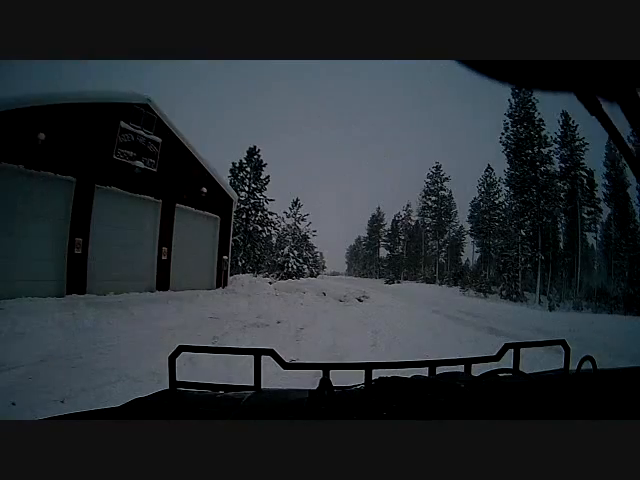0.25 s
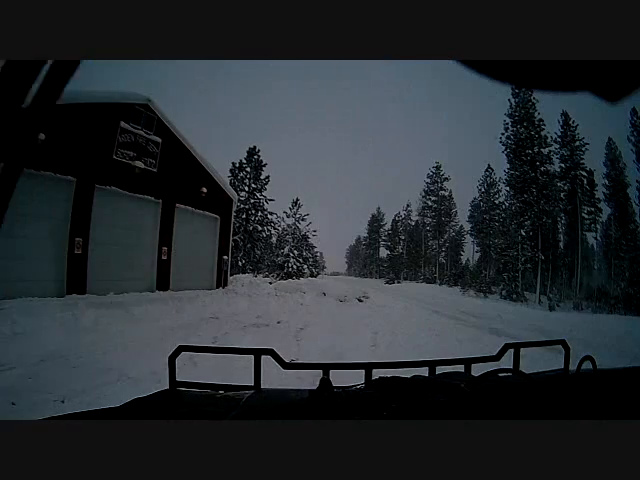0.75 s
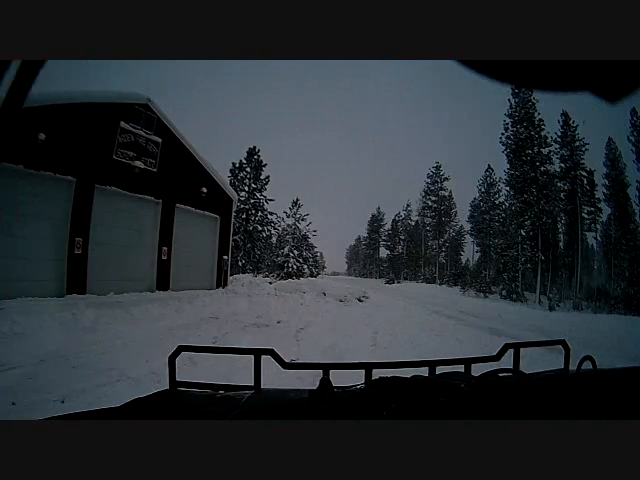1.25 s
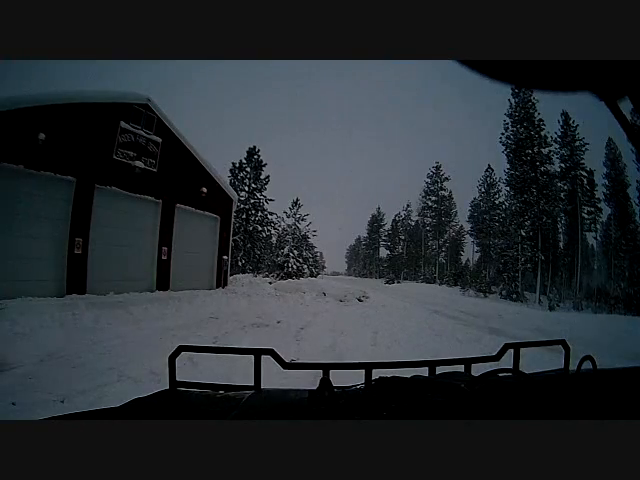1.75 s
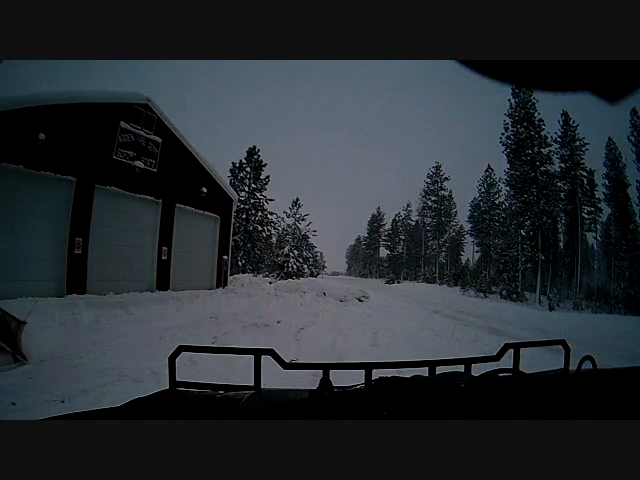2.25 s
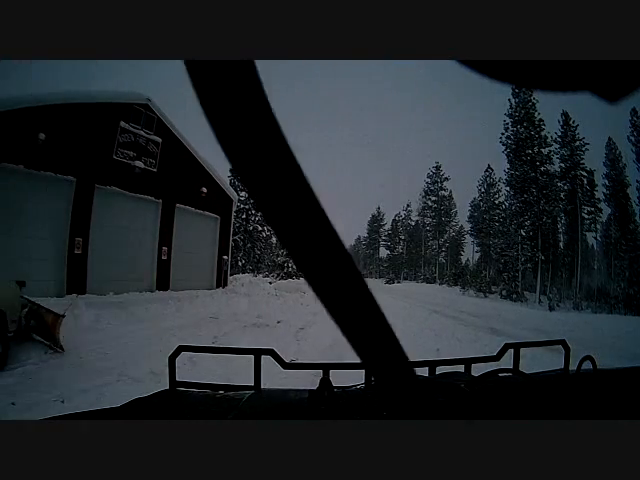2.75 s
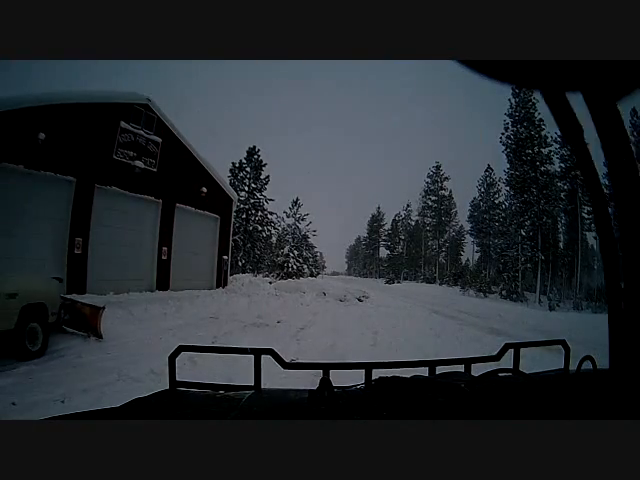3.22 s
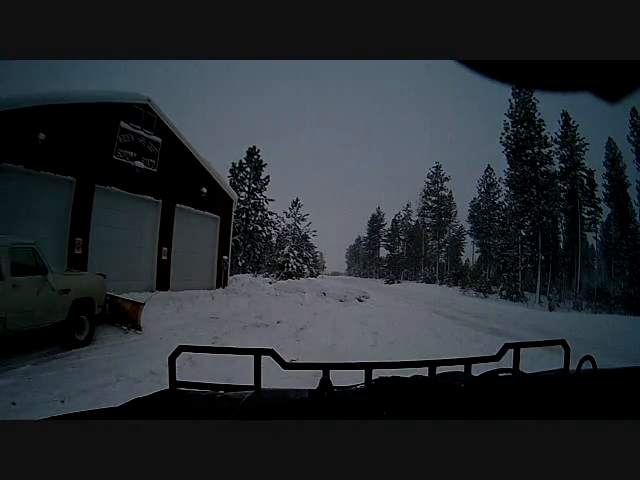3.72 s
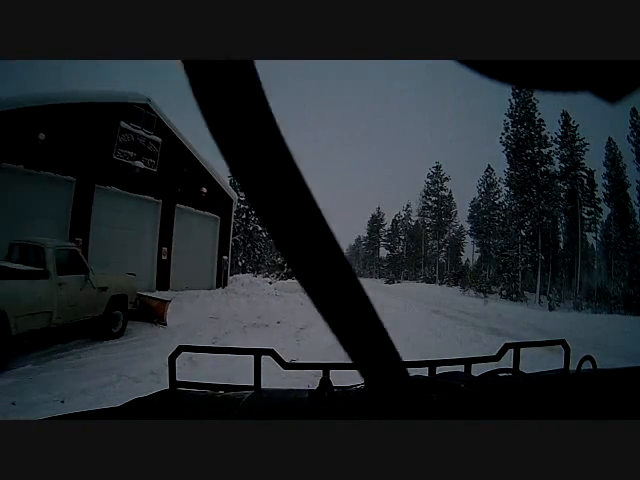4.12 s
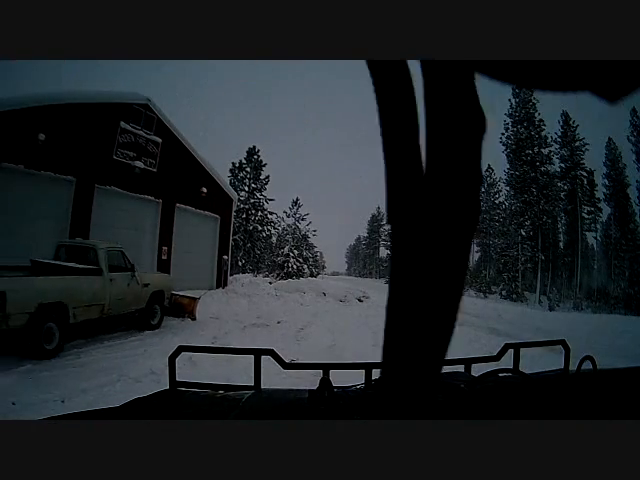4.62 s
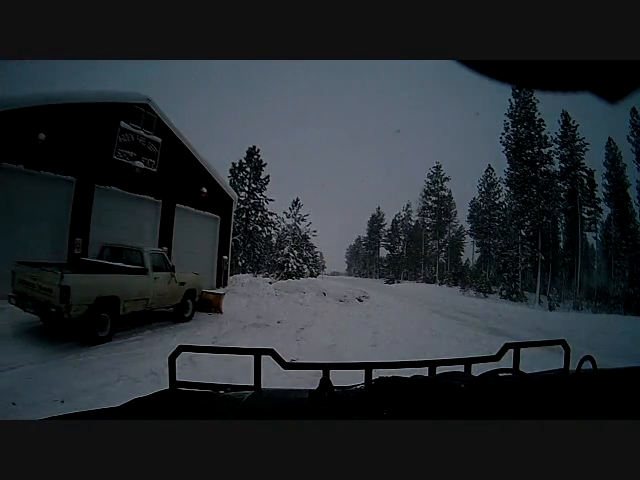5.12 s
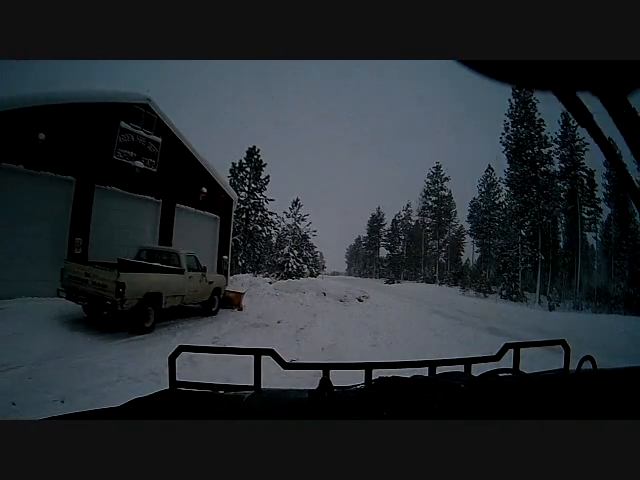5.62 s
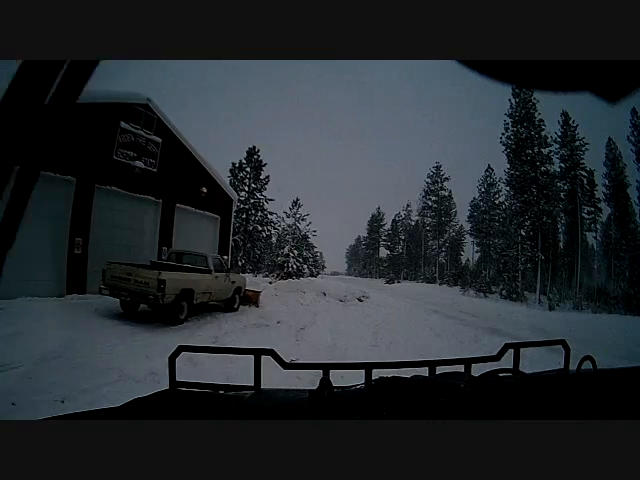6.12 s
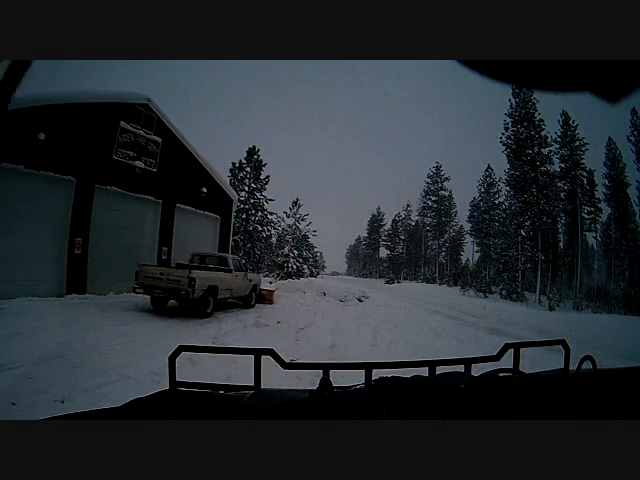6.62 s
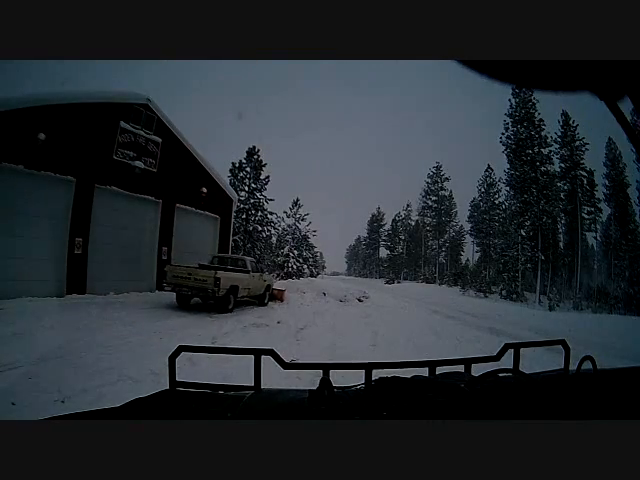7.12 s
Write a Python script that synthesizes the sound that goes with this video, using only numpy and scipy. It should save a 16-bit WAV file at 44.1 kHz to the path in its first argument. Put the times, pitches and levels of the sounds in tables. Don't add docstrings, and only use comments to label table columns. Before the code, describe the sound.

Close inside a small parked cab, a heater fan roars steadily over a low wavering engine idle. About every 1.35 seconds, icy wiper blades catch and slip in a rapid burst of blunt windscreen thumps, each with a thin metallic rattle and brief gritty scrape. A pickup's exhaust note rises outside and fades. A small microphone on the glass distorts the loudest thumps.

```python
import sys
import numpy as np
from scipy import signal
from scipy.fft import rfft, irfft
from scipy.io import wavfile
from scipy.ndimage import uniform_filter1d

SR = 44100
rng = np.random.default_rng(int(sys.argv[2]) if len(sys.argv) > 2 else 0)


def undo_db(level):
    steps = np.asarray(level, float) / 20
    return 10 ** steps


def dump_mix(stems):
    frames = np.atleast_2d(stems).T
    limited = np.clip(frames, -1, 1)
    pcm = np.round(limited * 32767).astype(np.int16)
    wavfile.write(sys.argv[1], SR, pcm)


N = 324576
TIME = np.arange(N) / SR
BINS = np.fft.rfftfreq(N, 1 / SR)

# (frequency [Hz], level per Hz [dB])
BLOWER_SPECTRUM = [(4, -18), (28, -4.5), (70, -3.5), (97, -3), (138, -1), (234, -11), (276, -0.5),
                   (579, -8.5), (789, -11.5), (1030, -6.5), (1580, -19.5), (1780, -24.5), (2800, -25.5),
                   (6000, -63)]
# (frequency [Hz], width [Hz], gain [dB])
DUCT_RESONANCES = [(140.7, 17, 5), (218, 41, 4), (256, 19, 1.5), (414.6, 83, 4.5), (499, 91, 3),
                   (585, 60, 7), (706, 52, 6.5), (829, 50, 6.5), (1010, 210, 2), (1323, 153, 4.5),
                   (1597, 213, 8.5), (1734, 49, -7.5), (1890, 34, 5), (2110, 54, 5), (2462, 82, 5),
                   (2840, 56, 3), (3280, 200, 4), (3555, 170, 5.5), (4000, 80, 2.5), (4670, 75, 7),
                   (820, 28, -3.5), (864, 19, -8.5), (1146, 54, -4.5), (1422, 50, -9), (1890, 43, -1),
                   (2140, 50, -1), (2600, 60, 0.5), (3160, 85, 0.5), (3470, 60, -3.5), (3840, 160, -4)]
BLOWER_DB, SWELL_DB, FLICKER_DB = -26, .6, 1.9

# (frequency [Hz], level [dB], wobble [dB])
IDLE_NOTES = [(59.5, -45.5, 6.5), (80.7, -47, -5), (112.5, -45, 0)]
# (frequency [Hz], level [dB])
IDLE_SHAKE = [(15.5, -39), (37.3, -40.5)]
# (time [s], firing rate [Hz], level [dB], octave level [dB])
PICKUP_EXHAUST = [
    (0, 42.7, -54, -34),
    (.5, 46.5, -53, -53),
    (1, 53.6, -36, -55),
    (1.5, 60, -37, -54),
    (2.001, 69.4, -30.5, -27.5),
    (2.4, 74, -33.5, -45),
    (3.2, 75.8, -33, -39),
    (3.999, 77.06, -37, -36),
    (5.498, 78.4, -66, -43),
    (7.36, 76.9, -48, -50),
]

# (frequency [Hz], level per Hz [dB])
SCRAPE_SPECTRUM = [(1500, 1.5), (3000, 3.5), (5000, -11), (7000, -15.5), (8500, -23.5), (16000, -28)]
SCRAPE_DB, SCRAPE_S, GRAIN_DB = -35, .0045, 3.5

# (time [s], force [dB], snap delay [ms], snap level [dB], high ring level [dB])
BLADE_FLIPS = [
    [(.7646, -5.5, 5.9, -18.5, -35), (2.1113, -9, 5.7, -17.5, -24), (3.4547, -5, 6.1, -17, -32),
     (4.7884, -5.5, 5.4, -29, -48), (6.1446, -1, 4.4, -22, -48)],
    [(2.1817, -3, 3.9, -17, -48), (3.5299, 0, 5.2, -17.5, -40), (6.1237, -4.5, 4.8, -20, -46)],
]
# (time [s], force [dB], snap delay [ms], snap level [dB])
JUDDER_SLIPS = [(0.746, -7.5, 6.3, -32), (0.7747, -9, 6.1, -37), (0.7868, -11, 5.2, -50),
                (0.804, -7.5, 5.2, -33), (0.8203, -6.5, 6.1, -28), (0.8361, -8.5, 3.8, -40),
                (0.8469, -11.5, 0.46, -32), (2.0743, -11.5, 1.2, -46), (2.0927, -5.5, 9, -39),
                (2.1212, -1.5, 7.2, -25), (2.158, -9, 8.6, -43), (2.1663, -6, 1.6, -42),
                (2.189, -4.5, 5.6, -33), (2.1942, -2, 4.4, -22.5), (2.2022, -16, 1.9, -42),
                (3.4197, -12, .1, -45), (3.4361, -5.5, 5.3, -23), (3.4655, -6, 5.1, -26),
                (3.4796, -4.5, 4.2, -34), (3.5084, -5.5, 3.7, -33), (3.544, -5, 11, -28),
                (3.5666, -8, 3.4, -46), (3.584, -8, 1.2, -31), (4.7563, -10.5, 4.2, -43),
                (4.7728, -5, 3.8, -31), (4.7992, -10.5, 4.8, -44), (4.8082, -7.5, 5.4, -45),
                (6.1032, -7, 4.5, -28), (6.1618, -5, 4.8, -23.5), (6.1733, -7, .1, -30)]

# (frequency [Hz], level [dB], time to fade 60 dB [s])
FRAME_RINGS = [
    [(1400, 0.5, 0.0097), (1900, -14, 0.0035), (2350, -5, 0.0061), (2620, 0, 0.0069), (2950, -3, 0.0035),
     (3550, -1, 0.0066), (4440, -13, 0.0054)],
    [(5540, -2, 0.0045), (6430, 2, 0.007), (6600, 0, 0.006)],
    [(8100, 2, 0.0043), (8720, 3, 0.017), (10300, -22, 0.003), (12500, -7, .003), (14500, -18, .002)],
]
# (time [s], low ring [dB], middle ring [dB], high ring [dB])
SETTLING_TICKS = [(.054, -60, -60, -58), (.8004, -43, -48, -60), (.8357, -35, -47, -60),
                  (1.298, -39, -47, -52), (2.1059, -34, -45, -60), (2.141, -26, -45, -62),
                  (3.519, -42, -44, -50), (3.559, -26, -40, -57), (3.5763, -41, -45, -60),
                  (3.609, -46, -54, -66), (3.617, -46, -54, -66), (4.7842, -32, -45, -61),
                  (4.8018, -34, -38, -53), (6.192, -41, -52, -60)]
# (time after the snap [ms], low ring under the snap [dB],
# middle ring under the snap [dB], high ring under its own snap [dB])
BLADE_REBOUNDS = [(5.7, -7, -7, -14), (4.0, -5, -14, -6)]
TICK_DB, TICK_COLOUR_DB = -34, (-19, -23)
SNAP_COLOUR_DB, COLOUR_SCATTER_DB = (-15, -31), 3.5
CHATTER_MS, CHATTER_DB, CHATTER_SCATTER = 4.8, -9, .25
DULL_HZ = 9000
CAB_DB, CAB_FADE_S = -13, .03

# (frequency [Hz], level [dB], time to fade 60 dB [s])
GLASS_RINGS = [(58, -9.5, 0.052), (109, 6, 0.098), (170.5, -5, 0.12), (229, -4.5, 0.069), (307, -32, 0.069),
               (418, -66, 0.017), (641, -10, 0.078), (842, -12.5, 0.11), (1480, -6.5, 0.098)]
PUSH_MS, PUSH_SCATTER, SWALLOWED, SWALLOW_SCATTER = 1.62, .12, .43, .13
SKIP_MS, SKIP_DB, SKIP_SCATTER_DB = 2.75, -10.5, 2.5
FLIP_PUSH_MS, FLIP_SWALLOWED, FLIP_SKIP_DB = 1.95, .31, -11.5

# (frequency [Hz], level per Hz [dB])
CAMERA_HISS = [(2940, -29), (5000, 1), (7960, -3), (15100, -3), (15700, -4.5)]
# (frequency [Hz], level [dB])
CAMERA_WHINE = (15176, -84)
CLEAR_SEAMS = {6: -47, 16: -44, 21: -48, 27: -43, 56: -44, 66: -45, 81: -45, 104: -44, 130: -47, 133: -44,
               134: -45, 143: -45}
HISS_DB, TOP_HZ = -66, 15800
OVERLOAD_LEVEL, KNEE = .51, 8
FIRST_SEAM_S, BLOCK_S = .07195, 2036 / SR
SEAM_DB, SEAM_SCATTER_DB, FIRST_JUMP_DB = -51.5, 1.5, -14.5


def unit(x):
    return x / np.sqrt(np.mean(x ** 2))


def slope_db(points):
    hz, db = np.transpose(points)
    return np.interp(np.log(BINS + 1), np.log(hz), db)


def shaped_noise(db):
    return irfft(rfft(rng.standard_normal(N)) * undo_db(db), N)


def walk(rate):
    k = int(SR / rate)
    levels = np.repeat(rng.standard_normal(N // k + 1), k)
    return 1.32 * uniform_filter1d(uniform_filter1d(levels, k), k)[:N]


def add(out, s, piece):
    i = int(s * SR)
    out[i:i + len(piece)] += piece[:N - i]


def blower():
    db = slope_db(BLOWER_SPECTRUM) - 30 * (BINS > 6000)
    for hz, width, gain_db in DUCT_RESONANCES:
        db = db + gain_db / (1 + (2 * (BINS - hz) / width) ** 2)
    air = rfft(rng.standard_normal(N)) * undo_db(db)
    out, swell = 0, walk(2.5)
    place = 2 * np.log2((BINS + 1) / 20)
    for k in range(19):
        band = irfft(air * np.clip(1 - abs(place - k), 0, 1), N)
        wander_db = SWELL_DB * swell + FLICKER_DB * walk(14)
        out = out + band * undo_db(wander_db * (1 - k / 20))
    gusts = undo_db(.55 * walk(70))
    return unit(out * gusts) * undo_db(BLOWER_DB)


def pickup():
    s, *columns = np.transpose(PICKUP_EXHAUST)
    hz, db, octave_db = (np.interp(TIME, s, c) for c in columns)
    turn = 2 * np.pi * (np.cumsum(hz) / SR + .14 * walk(5))
    octave = undo_db(octave_db - .5 + .48 * walk(21)) * np.sin(2 * turn)
    return undo_db(db) * np.sin(turn) + octave


def idling_engine():
    out = np.zeros(N)
    for hz, db, wobble in IDLE_NOTES:
        level = undo_db(db + 1 + wobble * walk(6.8))
        out += level * np.sin(2 * np.pi * (hz * TIME + .043 * walk(1.83)))
    for hz, db in IDLE_SHAKE:
        out += undo_db(db + 3 + walk(2)) * np.sin(2 * np.pi * hz * TIME + .5 * walk(.8))
    return out


def scrape():
    grip, t = np.zeros(N), TIME[:3000]
    for s, force_db, *_ in JUDDER_SLIPS + BLADE_FLIPS[0] + BLADE_FLIPS[1]:
        add(grip, s, undo_db(force_db) * t / SCRAPE_S * np.exp(1 - t / SCRAPE_S))
    low_cut = np.where(BINS > 1200, 0, -400)
    grit = unit(shaped_noise(slope_db(SCRAPE_SPECTRUM) + low_cut))
    return undo_db(SCRAPE_DB + GRAIN_DB * walk(500)) * grip * grit


def coloured(s, db, under, chance):
    return (s, db, *(db + np.array(under) + COLOUR_SCATTER_DB * chance[:2]))


def snaps():
    rows = [(row, back) for blade, back in zip(BLADE_FLIPS, BLADE_REBOUNDS) for row in blade]
    rows += [(row, None) for row in JUDDER_SLIPS]
    out = list(SETTLING_TICKS)
    for (row, back), c in zip(rows, rng.standard_normal((len(rows), 4, 4))):
        s, force_db, delay_ms, db, *high = row
        out.append(coloured(s, force_db + TICK_DB + 2.1 * c[0, 2], TICK_COLOUR_DB, c[0]))
        s += delay_ms / 1000
        if high:
            out.append((s, db, db + SNAP_COLOUR_DB[0], high[0]))
            back_ms, low_db, middle_db, high_db = back
            s += back_ms / 1000
            out.append((s, db + low_db, db + middle_db, high[0] + high_db))
            db += low_db
        else:
            out.append(coloured(s, db, SNAP_COLOUR_DB, c[1]))
        for r in c[2:]:
            s += CHATTER_MS * np.exp(CHATTER_SCATTER * r[2]) / 1000
            db += CHATTER_DB
            out.append(coloured(s, db + 1.4 * r[3], SNAP_COLOUR_DB, r))
    return out


def rattles():
    out, t, knocks = np.zeros(N), TIME[:1000], snaps()
    chance = rng.standard_normal((len(knocks), 16, 150))
    for (s, *levels), c in zip(knocks, chance):
        scratch = c[0] * t[:150] * np.exp(-t[:150] / .0005)
        k = 0
        for db, modes in zip(levels, FRAME_RINGS):
            body = 0
            for hz, gain_db, t60 in modes:
                k += 1
                tone = np.sin(2 * np.pi * hz * (1 + c[k, 0] / 60) * t)
                body = body + undo_db(gain_db + c[k, 2]) * tone * np.exp(-np.log(1000) * t / t60)
            ring = np.convolve(scratch, body)
            add(out, s - .001, undo_db(db + 6) * ring / abs(ring).max())
    out = signal.lfilter(*signal.butter(1, DULL_HZ, fs=SR), out)
    echo = rng.standard_normal(4000) * np.exp(-np.log(1000) * TIME[:4000] / CAB_FADE_S)
    return out + undo_db(CAB_DB) * signal.fftconvolve(out, echo / np.linalg.norm(echo))[:N]


def slips():
    rows = [(row, PUSH_MS, SWALLOWED, SKIP_DB) for row in JUDDER_SLIPS]
    rows += [(row, FLIP_PUSH_MS, FLIP_SWALLOWED, FLIP_SKIP_DB) for row in BLADE_FLIPS[0] + BLADE_FLIPS[1]]
    out = []
    for (row, push_ms, swallowed, skip_db), c in zip(rows, rng.standard_normal((len(rows), 6))):
        s, db = row[:2]
        out.append((s, db, push_ms * np.exp(PUSH_SCATTER * c[0]), swallowed + SWALLOW_SCATTER * c[1]))
        landing_s = s + SKIP_MS * np.exp(.14 * c[2]) / 1000
        landing_db = db + skip_db + SKIP_SCATTER_DB * c[3]
        landing_ms = PUSH_MS * np.exp(PUSH_SCATTER * c[4])
        out.append((landing_s, landing_db, landing_ms, .098 + SWALLOW_SCATTER * c[5]))
    return out


def panel(force, hz, t60):
    w = 2 * np.pi * hz
    return signal.lfilter(*signal.bilinear([1, 0, 0], [1, 2 * np.log(1000) / t60, w * w], SR), force)


def thumps():
    out, t, pushes = np.zeros(N), TIME[:6000] * 1000, slips()
    chance = rng.standard_normal((len(pushes), len(GLASS_RINGS), 2))
    noise = rng.standard_normal((len(pushes), 6000))
    trim_noise = signal.lfilter(*signal.butter(3, [300, 1600], "band", fs=SR), noise)
    for (s, db, push_ms, swallowed), c, trim in zip(pushes, chance, trim_noise):
        force = np.sin(np.pi * np.clip(t / push_ms, 0, 1)) ** 2
        ring, total_gain = 0, 0
        for (hz, gain_db, t60), (a, b) in zip(GLASS_RINGS, c):
            gain = undo_db(gain_db + 2 * a)
            ring = ring + gain * panel(force, hz * (1 + .032 * b), t60)
            total_gain += gain
        ring = ring - np.clip(swallowed, 0, 1) * total_gain * force
        shudder = trim * (t / 4) * np.exp(-t / 6)
        add(out, s - push_ms / 2000, undo_db(db - 7.5) * (ring + shudder))
    return out


def scene():
    background = blower() + pickup() + idling_engine()
    wipers = scrape() + rattles() + thumps()
    return (background + wipers)[None]


def seams():
    out = []
    for k, (a, b) in enumerate(rng.standard_normal((int(N / SR / BLOCK_S), 2))):
        s = FIRST_SEAM_S + k * BLOCK_S
        if s < N / SR:
            out.append((s, CLEAR_SEAMS.get(k, SEAM_DB + SEAM_SCATTER_DB * a), np.sign(b)))
    return out


def roll_off(x):
    return signal.sosfilt(signal.butter(12, 16520, fs=SR, output="sos"), x)


def record(dry):
    hiss = unit(shaped_noise(slope_db(CAMERA_HISS))) * undo_db(HISS_DB)
    whine_hz, whine_db = CAMERA_WHINE
    x = signal.lfilter(*signal.butter(1, 9, "high", fs=SR), dry[0])
    x = x + hiss + undo_db(whine_db + 3) * np.sin(2 * np.pi * whine_hz * TIME)
    x = x / (1 + abs(x / OVERLOAD_LEVEL) ** KNEE) ** (1 / KNEE)
    jump = np.exp(-TIME[:600] / .0015)
    for s, db, sign in seams():
        add(x, s, sign * undo_db(db + 11.5) * jump)
    x = irfft(rfft(x) * (BINS < TOP_HZ), N)
    add(x, FIRST_SEAM_S, -undo_db(FIRST_JUMP_DB) * jump)
    return roll_off(x[None])


dry = scene()
out = record(dry)
dump_mix(out)
```